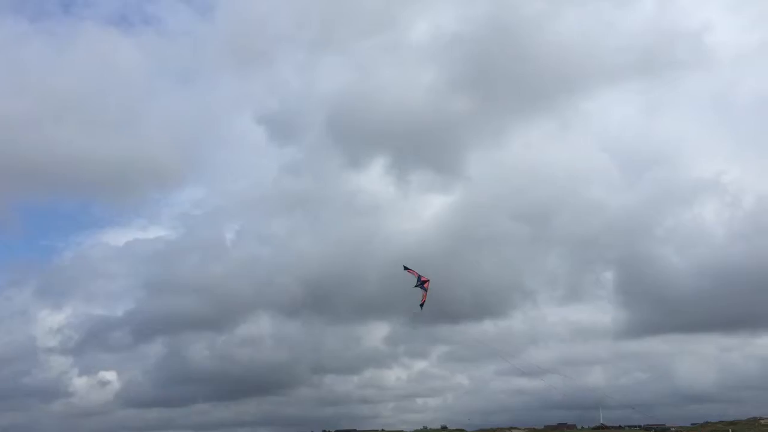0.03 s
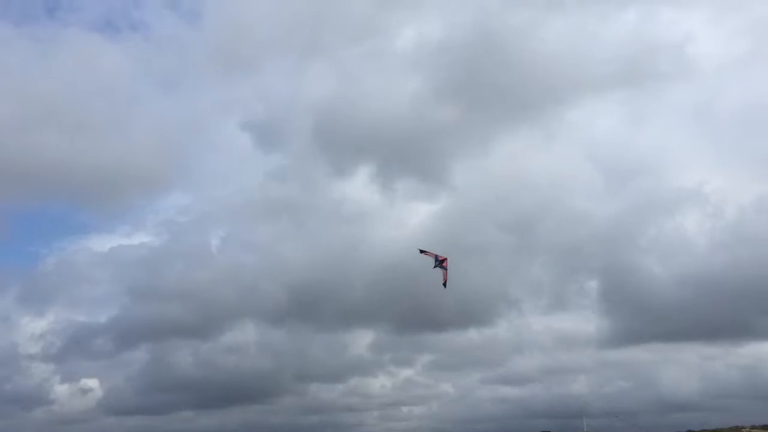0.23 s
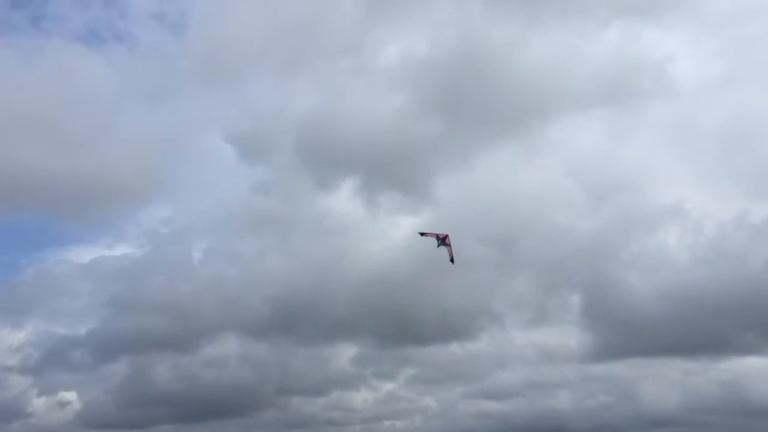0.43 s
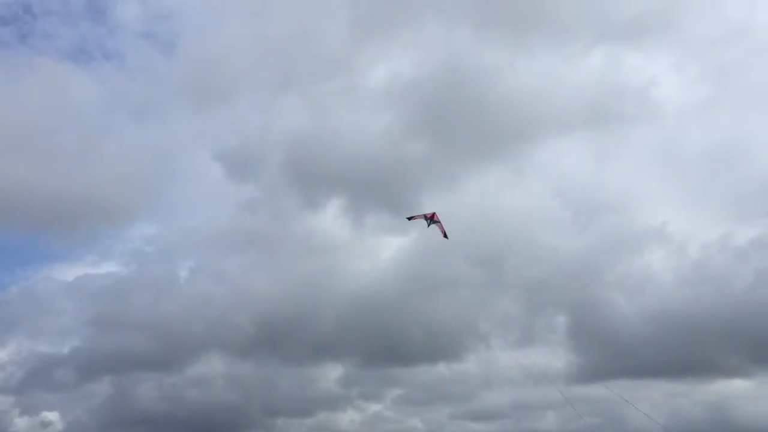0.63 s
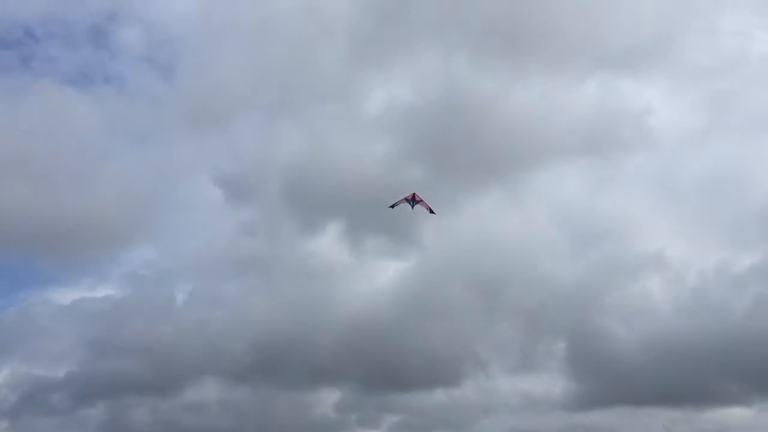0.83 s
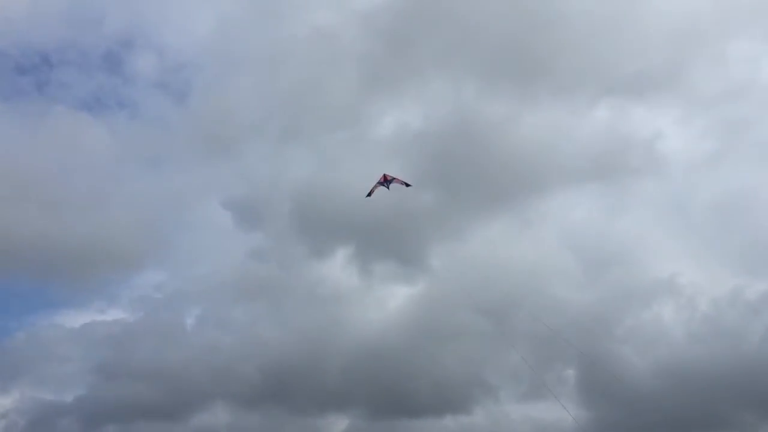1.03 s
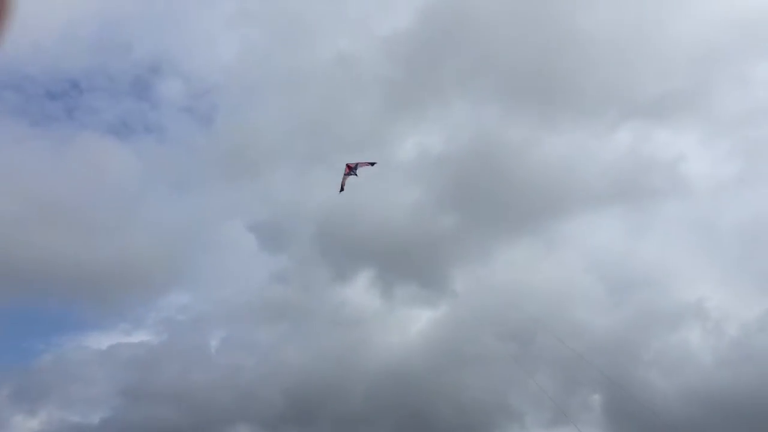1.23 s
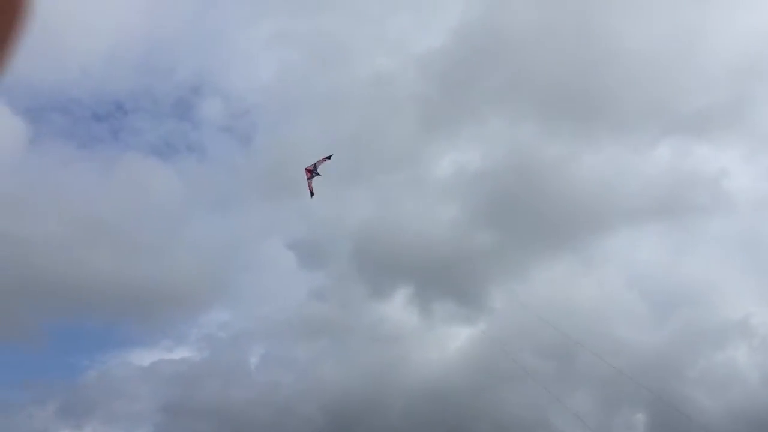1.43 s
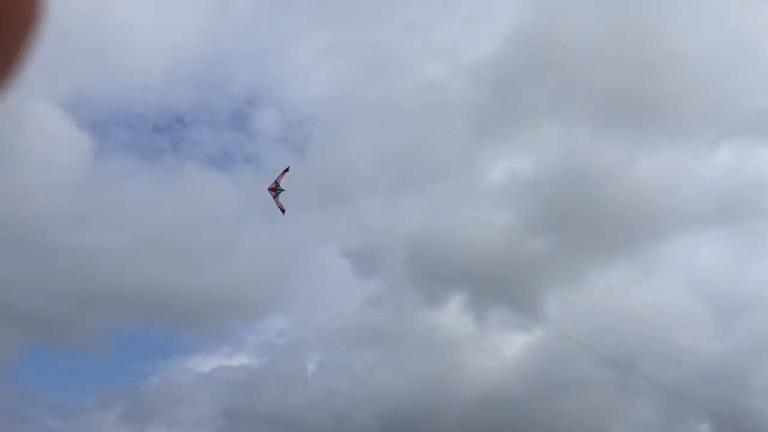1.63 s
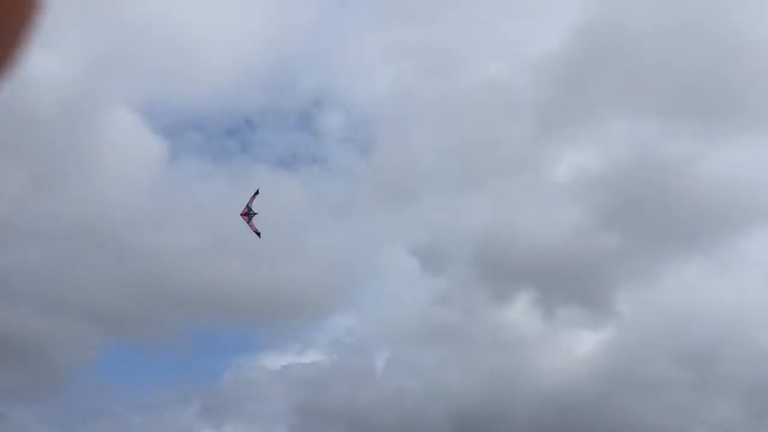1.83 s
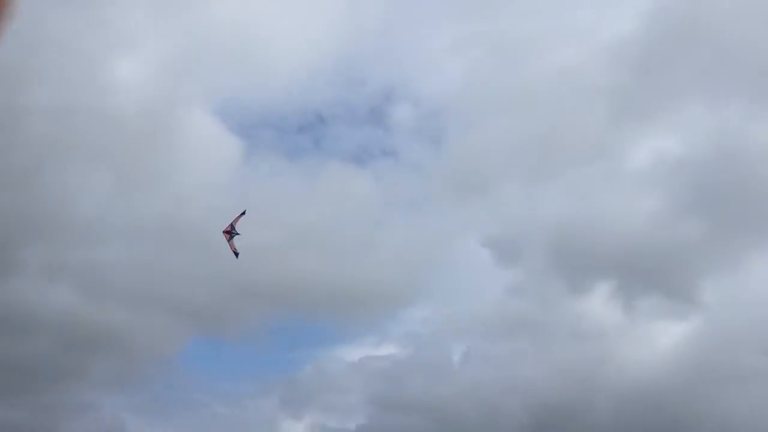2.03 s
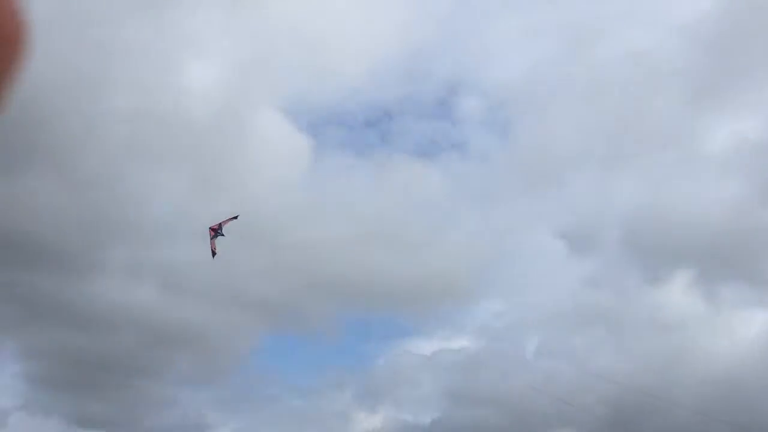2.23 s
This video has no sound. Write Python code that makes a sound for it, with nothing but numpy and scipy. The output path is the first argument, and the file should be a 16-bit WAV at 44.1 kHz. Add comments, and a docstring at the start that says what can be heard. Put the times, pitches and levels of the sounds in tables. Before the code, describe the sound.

Strong wind thumps and flutters against the microphone, hardest in the first second, then easing to an uneven rumble. Behind it, kite lines whistle faintly over an open field, and the kite hums softly near the end.

```python
"""Stunt kite in strong wind

Large eddies thump the microphone and small ones flutter and rasp across its port, over a rumble;
the hardest overload the diaphragm with a snap. Behind them two kite lines shed vortices and whistle
thinly with their speed through the air, the kite hums as it turns, and wind rushes over an open field."""
import sys
import numpy as np
from scipy import signal
from scipy.fft import rfft, irfft
from scipy.io import wavfile
from scipy.ndimage import uniform_filter1d

SR = 44100
rng = np.random.default_rng(int(sys.argv[2]) if len(sys.argv) > 2 else 0)


def to_wav(sig):
    """Store sig (one row per channel, or 1-D mono) as 16-bit WAV at the path in sys.argv[1].

    Samples outside -1..1 are clipped; the rate is SR.
    """
    pcm = np.clip(np.atleast_2d(sig), -1, 1) * 32767
    pcm = np.round(pcm).astype(np.int16)
    wavfile.write(sys.argv[1], SR, pcm.T)  # frames by channels


N = 101429
T = np.arange(N) / SR


def from_db(db):
    """Decibels to gain."""
    return 10 ** (np.asarray(db) / 20)


def rms_one(x):
    """Scale to rms 1."""
    return x / np.sqrt(np.mean(x ** 2) + 1e-20)


def in_time(rows):
    """Each column after time, interpolated to every sample."""
    times_s, *columns = np.transpose(rows)
    return [np.interp(T, times_s, column) for column in columns]


def bins_hz(size):
    """FFT bin frequencies."""
    return np.arange(size // 2 + 1) * SR / size


def bin_gains(spectrum, size):
    """Gain per FFT bin from (frequency [Hz], level [dB]) rows."""
    hz, db = np.transpose(spectrum)
    log_bins = np.log(np.maximum(bins_hz(size), 1))
    return from_db(np.interp(log_bins, np.log(hz), db))


def drift(rate_hz):
    """Smooth random wander up to about rate_hz; rms 1."""
    white = rfft(rng.standard_normal(N))
    return rms_one(irfft(white / (1 + (bins_hz(N) / rate_hz) ** 4), N))


def coloured(spectrum):
    """Steady noise of the given spectrum; rms 1."""
    white = rfft(rng.standard_normal(N))
    return rms_one(irfft(white * bin_gains(spectrum, N), N))


def rumble():
    """Pressure noise of the flow on the microphone port."""
    # flow strength: (time [s], level [dB])
    flow = [(.08, -30.5), (.26, -31), (.45, -30), (.6, -19), (.72, -30), (.85, -23.5), (1.0, -28.5),
            (1.08, -40), (1.16, -24.5), (1.29, -39.5), (1.35, -30), (1.61, -29), (1.7, -40.5), (1.76, -38),
            (1.84, -23), (2.03, -35), (2.11, -55), (2.3, -38)]
    # pressure spectrum: (frequency [Hz], relative density [dB])
    spectrum = [(20, -28.5), (40, 1.5), (66, 2.5), (100, 1.5), (160, -3.5), (250, -6.5), (400, -25),
                (700, -35.5), (1500, -44), (4000, -75)]
    flow_db, = in_time(flow)
    noise = coloured(spectrum)
    envelope = np.sqrt(uniform_filter1d(noise ** 2, size=2200) + 1e-9)
    return from_db(flow_db) * rms_one(noise / envelope)


def wavering_tone(curve, width_hz):
    """Vortex shedding: a narrow noise band, with weaker ones from neighbouring stretches either side."""
    spread, side_gain = .045, from_db(-9.5)
    hz, db = in_time(curve)
    out = 0
    for ratio, gain in ((1, 1), (1 - spread, side_gain), (1 + spread, side_gain)):
        phase = 2 * np.pi * np.cumsum(hz * ratio) / SR
        out += gain * (drift(width_hz) * np.cos(phase) + drift(width_hz) * np.sin(phase))
    return from_db(db) * rms_one(out)


def line_whistles():
    """Two whistles of shed vortices; the higher comes from the thin, fast stretch of line."""
    # whistles: (time [s], pitch [Hz], level [dB])
    high = [(.08, 4566, -70.5), (.3, 4530, -69.5), (.45, 4393, -66.5), (.62, 4247, -71), (.76, 4088, -68),
            (.88, 4060, -64.5), (.98, 4333, -66), (1.1, 4200, -64.5), (1.25, 4120, -60),
            (1.36, 4306, -70.5), (1.6, 4820, -76), (1.72, 4176, -88), (1.88, 3700, -68.5),
            (2.02, 3910, -71.5), (2.13, 4350, -72), (2.3, 4490, -70)]
    low = [(.08, 2300, -60.5), (.3, 2256, -66.5), (.75, 2030, -56), (.98, 2212, -57.5), (1.24, 2020, -59),
           (1.55, 2492, -63), (1.82, 2320, -59.5), (2.05, 2246, -67), (2.3, 2330, -61)]
    return wavering_tone(high, width_hz=64) + wavering_tone(low, width_hz=190)


def line_rush():
    """Slow stretches of line whoosh through the air; faster ones hiss."""
    # envelopes: (time [s], level [dB])
    whoosh_level = [(.08, -45.5), (.3, -49), (.7, -52), (1.0, -48), (1.35, -47), (1.75, -48.5), (2.0, -49),
                    (2.1, -52.5), (2.3, -52.5)]
    hiss_level = [(.08, -59), (.6, -62.5), (1.1, -65), (1.55, -61), (1.9, -59), (2.08, -60), (2.22, -56),
                  (2.3, -58.5)]
    # spectra: (frequency [Hz], relative density [dB])
    whoosh_spectrum = [(250, -2), (500, 4.5), (900, 3), (1400, -2.5), (1900, -5.5), (2300, -10),
                       (2700, -27.5), (4000, -38.5)]
    hiss_spectrum = [(900, -23.5), (1600, 2), (2300, -1.5), (2800, 1), (3500, -1.5), (4400, -8.5),
                     (4900, -20.5), (7000, -30)]
    whoosh_db, = in_time(whoosh_level)
    hiss_db, = in_time(hiss_level)
    return from_db(whoosh_db) * coloured(whoosh_spectrum) + from_db(hiss_db) * coloured(hiss_spectrum)


def field_wind():
    """Far rush of wind over the field, with a faint treble hiss."""
    # spectra: (frequency [Hz], relative density [dB])
    rush_spectrum = [(30, -9.5), (100, -3.5), (250, 4.5), (450, -4), (570, -9), (720, -16), (1100, -13.5),
                     (1900, -21), (2700, -39.5), (5000, -44), (9000, -53.5)]
    treble_spectrum = [(3000, -14), (5200, 3), (7000, 4.5), (9300, 8.5), (10400, -2), (11500, 4),
                       (14000, 5), (16000, 1.5)]
    # hiss envelope: (time [s], level [dB])
    treble_level = [(.08, -63.5), (.2, -72), (.32, -83), (.5, -72.5), (.7, -88), (1.4, -85), (1.61, -70),
                    (1.72, -77), (1.95, -75), (2.3, -74.5)]
    rush_db = -43 - .5 * drift(rate_hz=8)
    treble_db, = in_time(treble_level)
    return from_db(rush_db) * coloured(rush_spectrum) + from_db(treble_db) * coloured(treble_spectrum)


def thumps():
    """Each large eddy pushes and pulls the diaphragm once or twice."""
    # large eddies: (time [s], envelope peak [dB], pitch [Hz])
    eddies = [(0.107, -21, 75), (0.196, -6.5, 148), (0.226, -31.5, 184), (.265, -22, 70), (0.335, -18, 90),
              (.348, -7, 204), (0.361, -15, 68), (0.397, -10.5, 191), (.458, -24.5, 85.5), (0.495, -9, 130),
              (.532, -16.5, 80), (0.557, -12, 100), (0.576, -8, 153.5), (.603, -7.5, 88), (0.624, -6.5, 86),
              (0.694, -27.5, 76), (0.776, -9.5, 79), (0.79, -9, 191), (0.829, -7.5, 131.3),
              (0.863, -13, 110.5), (0.91, -8.5, 101), (0.926, -7, 293), (.96, -7.5, 119.6),
              (0.98, -8.5, 68.4), (1.065, -22, 111.6), (1.167, -20, 82), (1.244, -19.5, 115),
              (1.333, -20, 142), (1.354, -17.5, 78.6), (1.418, -17.5, 76), (1.46, -12.5, 131),
              (1.569, -18, 73), (1.603, -16.5, 170), (1.809, -13.5, 160), (1.877, -10, 130),
              (1.913, -15.5, 79), (2.012, -19.5, 153)]
    sigma_cycles = .52
    out = np.zeros(N)
    for (time_s, db, hz), phase_cycles in zip(eddies, rng.random(len(eddies))):
        cycles = (T - time_s) * hz
        envelope = np.exp(-.5 * (cycles / sigma_cycles) ** 2)
        out += from_db(db) * envelope * np.cos(2 * np.pi * (cycles + phase_cycles))
    return out


def flutters(size=8192):
    """Small eddies rasp across the port in brief bursts, bright at the peak and dull in the tails."""
    # bursts: (time [s], half-width [s], level [dB], upper edge [Hz])
    bursts = [(0.155, 0.015, -28.5, 500), (0.189, 0.0079, -13, 920), (0.226, 0.0068, -34, 330),
              (.326, 0.0069, -23, 850), (.345, 0.0037, -16, 864), (0.395, 0.0064, -23, 650),
              (.427, 0.0073, -21.5, 800), (0.484, 0.0013, -13, 936), (.495, 0.0025, -10.5, 1050),
              (0.583, 0.0078, -8, 780), (.602, 0.0029, -9.5, 720), (.619, 0.0043, -13.5, 720),
              (0.658, 0.017, -33.5, 362), (0.768, 0.0077, -20, 880), (.797, 0.0069, -19.5, 730),
              (0.82, 0.0089, -14, 620), (.899, .005, -26.5, 650), (.917, 0.0082, -17.5, 860),
              (0.948, 0.0056, -16.5, 1007), (.967, 0.0093, -22.5, 520), (1.045, 0.0059, -30, 494),
              (1.13, 0.0091, -36.5, 344), (1.242, 0.0076, -33, 440), (1.323, 0.0091, -25, 466),
              (1.46, 0.0033, -24.5, 464), (1.48, 0.0055, -25.5, 537), (1.6, 0.0029, -24.5, 316),
              (1.786, 0.0031, -20.5, 510), (1.806, 0.0067, -27.5, 600), (1.835, 0.0061, -26.5, 460),
              (1.88, 0.018, -25.5, 350), (1.925, 0.0036, -25.5, 328), (2.004, 0.0031, -20.5, 420),
              (2.017, 0.0044, -33, 314)]
    port_low_hz, port_top_hz = 139, 4200
    slope_db_per_octave, tail_edge_ratio, rough_db = 21, .58, 5
    hz, offsets = bins_hz(size), np.arange(size) - size // 2
    roughness = from_db(rough_db * drift(rate_hz=233))
    port = hz ** 2 / np.hypot(hz ** 2, port_low_hz ** 2) / np.hypot(1, (hz / port_top_hz) ** 2)
    out = np.zeros(N + 2 * size)
    for time_s, half_width_s, db, edge_hz in bursts:
        at = int(time_s * SR) + offsets
        swell = 1 / np.cosh(np.clip(1.05 * offsets / SR / half_width_s, -50, 50))
        eddies = rng.standard_normal(size) * swell * roughness.take(at, mode="wrap")
        spectrum = 0
        for share, top_hz in ((swell, edge_hz), (1 - swell, tail_edge_ratio * edge_hz)):
            octaves = np.log2((hz + 1) / top_hz)
            spectrum += rfft(eddies * share) / np.hypot(1, from_db(slope_db_per_octave * octaves))
        burst = irfft(spectrum * port, size)
        out[at] += from_db(db) * burst * np.sqrt(np.sum(swell ** 2) / np.sum(burst ** 2))
    return out[:N]


def snaps(size=2048):
    """The hardest eddies overload the diaphragm, each with one brief, bright jolt."""
    # overloads: (time [s], peak [dB])
    overloads = [(0.1874, -10), (.1922, -8), (0.3474, -10.5), (.494, -10), (0.577, -14.5), (.5812, -10),
                 (0.6007, -4.5), (.609, -15.5)]
    # jolt spectrum: (frequency [Hz], relative density [dB])
    spectrum = [(150, -8), (700, 6.5), (1300, -4.5), (2200, -8.5), (3200, -20.5), (5000, -34.5),
                (8000, -47), (15000, -51)]
    gains = bin_gains(spectrum, size)
    out = np.zeros(N)
    for (time_s, peak_db), phase_cycles in zip(overloads, rng.random(len(overloads))):
        pulse = irfft(gains * np.exp(2j * np.pi * phase_cycles), size)
        jolt = np.roll(pulse, size // 2) * np.hanning(size)
        start = int(time_s * SR) - size // 2
        out[start:start + size] += from_db(peak_db) * jolt / np.abs(jolt).max()
    return out


def kite_hum():
    """The kite hums faintly as it turns, swelling near the end."""
    # hum: (time [s], pitch [Hz], level [dB])
    hum = [(1.9, 514, -69), (2.1, 540.7, -54.5), (2.26, 591, -45), (2.3, 587, -52)]
    return wavering_tone(hum, width_hz=35)


def casing(x):
    """Weak resonances of casing and port colour the buffeting."""
    # resonances: (frequency [Hz], width [Hz], boost [dB])
    modes = [(187, 14, 2.5), (297, 30, 3), (394, 44, 3.5), (647, 13, 1), (730, 30, 1), (930, 28, 2.5),
             (1244, 120, 4), (1500, 350, 0)]
    for hz, width_hz, boost_db in modes:
        radius = np.exp(-np.pi * width_hz / SR)
        numerator = (1 - radius ** 2) / 2 * np.array([1, 0, -1])
        denominator = [1, -2 * radius * np.cos(2 * np.pi * hz / SR), radius ** 2]
        x = x + (from_db(boost_db) - 1) * signal.lfilter(numerator, denominator, x)
    return x


def diaphragm(x):
    """The sluggish diaphragm rounds off hard pushes and dulls their edges."""
    max_swing, corner_hz, treble_db = .88, 2220, -5
    swing = max_swing * np.tanh(x / max_swing)
    lows = signal.sosfilt(signal.butter(1, corner_hz, fs=SR, output="sos"), swing)
    return lows + from_db(treble_db) * (swing - lows)


def scene():
    """Wind on the port, with kite and field behind; mono."""
    buffeting = diaphragm(casing(rumble() + thumps() + flutters() + snaps()))
    kite = line_whistles() + kite_hum() + line_rush()
    return (buffeting + kite + field_wind())[None]


def record(dry):
    """Brief silence, fast fade-in, steep low-pass."""
    start_s, fade_s, cutoff_hz = .083, .002, 15400
    opened = dry * np.clip((T - start_s) / fade_s, 0, 1)
    return signal.sosfilt(signal.ellip(10, .1, 80, cutoff_hz, fs=SR, output="sos"), opened)


dry = scene()
out = record(dry)
to_wav(out)
```